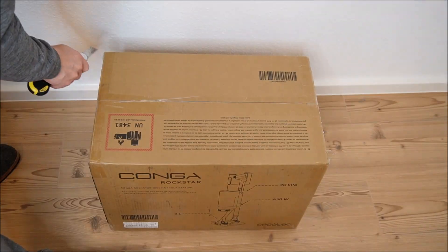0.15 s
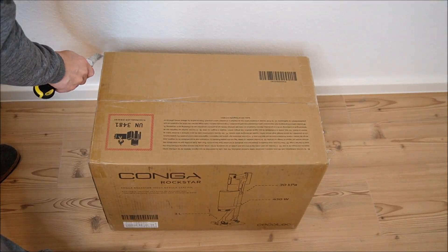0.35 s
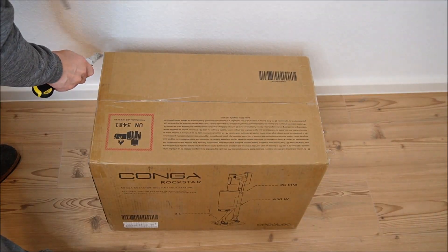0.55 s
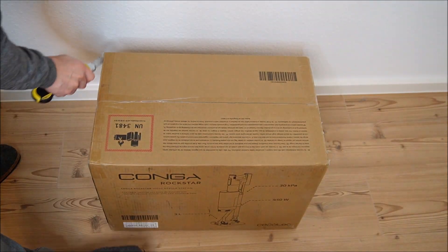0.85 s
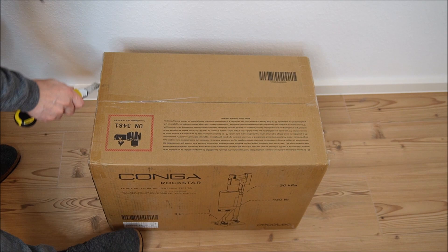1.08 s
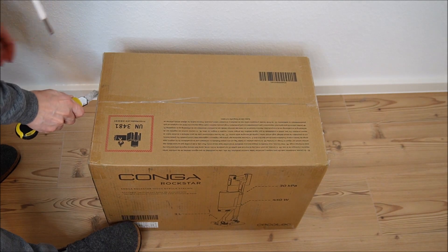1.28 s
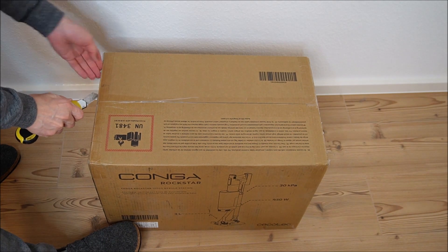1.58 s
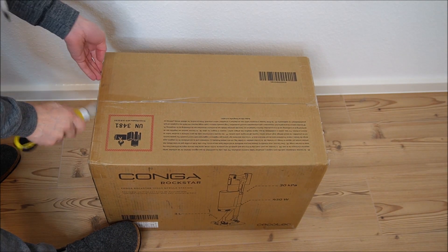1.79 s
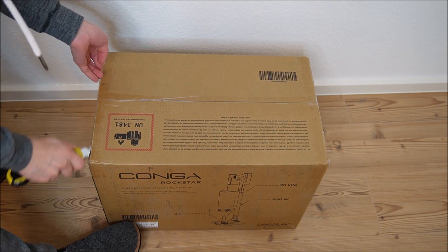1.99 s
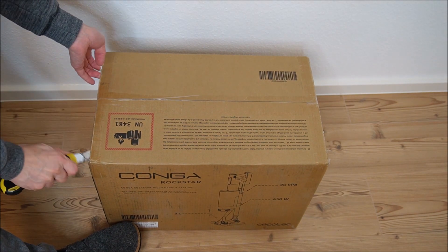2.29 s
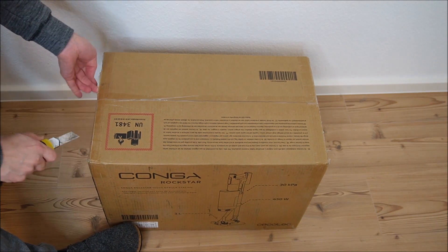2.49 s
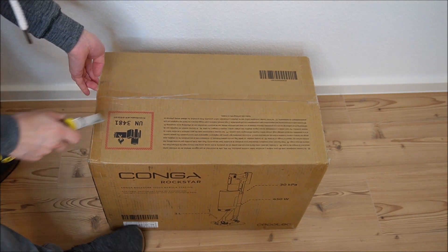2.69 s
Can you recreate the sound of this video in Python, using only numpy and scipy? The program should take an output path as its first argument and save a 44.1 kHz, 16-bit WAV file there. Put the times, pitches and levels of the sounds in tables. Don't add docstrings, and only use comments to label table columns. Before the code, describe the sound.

Box cutter slicing taped cardboard in rough bursts, with crackling tape and sharp blade knocks.

```python
import sys
import numpy as np
from scipy import signal
from scipy.fft import rfft, irfft, next_fast_len
from scipy.io import wavfile
from scipy.ndimage import uniform_filter1d, map_coordinates

SR = 44100
rng = np.random.default_rng(int(sys.argv[2]) if len(sys.argv) > 2 else 0)


def gain_from_db(level_db):
    decades = np.asarray(level_db, float) / 20
    return 10 ** decades


def transcribe(u):
    v = np.clip(np.atleast_2d(u).T, -1, 1)
    q = np.round(v * 32767).astype(np.int16)
    wavfile.write(sys.argv[1], SR, q)


N = 125685
T = np.arange(N) / SR

# [t/s, drag level/dB, box share/dB]
STROKES = [
    [(.638, -48, 9.5), (.665, -44, -7), (.728, -41, -5.5), (.74, -56, 0), (.8, -61, 9)],
    [(.842, -45, 3), (.855, -46.5, 1), (.87, -33, -4), (.9, -34.5, -2), (.95, -31, -9), (1.015, -39.5, 0.5),
     (1.035, -52, -2), (1.05, -44, 1)],
    [(1.05, -43, 8), (1.065, -44, 12.5), (1.1, -38.5, 4), (1.135, -42, 9), (1.16, -34, 0),
     (1.2, -37.5, -2.5), (1.24, -45.5, 3), (1.38, -60.5, 0), (1.6, -64.5, 3.5)],
    [(1.625, -56, 4), (1.64, -47.5, 4), (1.66, -37.5, -0.5), (1.74, -39, -5.5), (1.84, -50.5, 1)],
    [(1.84, -46, 12), (1.86, -51, 5), (1.93, -39, 1.5), (2.06, -39, -7.5), (2.13, -47.5, 3.5),
     (2.2, -57.5, -6), (2.3, -68, 1)],
    [(2.322, -52, -7), (2.37, -44.5, -11), (2.43, -41, -7), (2.445, -56.5, -1), (2.5, -44, -3.5),
     (2.575, -51.5, -10), (2.66, -65, -2)],
    [(2.68, -51.5, -5), (2.73, -51, 7), (2.765, -48.5, -3), (2.8, -40.5, 2), (2.85, -37, 12)],
]
# [t/s, level/dB, hold/s, box share/dB]
CATCHES = [(0.659, -36, 0.004, -11), (0.693, -40, 0.015, -12), (0.715, -45, .012, -7),
           (0.867, -31.5, 0.007, -7), (0.881, -33.5, .006, -4), (0.914, -34, 0.005, -9),
           (0.919, -27, 0.013, -10.5), (0.938, -34.5, .005, -1), (0.963, -28, 0.0087, -9),
           (0.985, -35, .003, -6), (1.01, -38.5, .006, 0), (1.053, -36, 0.006, -4),
           (1.067, -31, 0.01, -9.5), (1.077, -23, 0.0042, -8), (1.087, -22, 0.0081, -11),
           (1.1, -33.5, .008, -3), (1.116, -23, 0.0064, -2), (1.126, -26.5, 0.0054, -2),
           (1.139, -27.5, .004, -1), (1.144, -21.5, 0.0078, -9.5), (1.156, -29.5, 0.0035, -5),
           (1.164, -29.5, 0.0034, -6), (1.172, -29, 0.004, -2.5), (1.181, -26, 0.0096, -6),
           (1.194, -26, 0.0052, -3.5), (1.209, -32, 0.0031, -4), (1.218, -36, 0.0051, -3),
           (1.23, -36.5, 0.0036, -3.5), (1.639, -42.5, 0.013, 2), (1.66, -34, .003, -3),
           (1.663, -34, 0.019, -3), (1.709, -33, 0.0098, -2), (1.741, -33.5, 0.0023, -12),
           (1.845, -35.5, .004, 1), (1.848, -29.5, 0.01, -1), (1.8585, -17.5, 0.0087, -12),
           (1.875, -25.5, 0.013, -4.5), (1.892, -31.5, 0.0099, 2), (2.091, -32.5, 0.0071, -15),
           (2.368, -44, 0.0079, 5), (2.775, -38, 0.0045, 0), (2.804, -32, 0.0054, -6),
           (2.822, -19, 0.0073, -2.5), (2.838, -32.5, .008, 0)]
# [t/s, crack level/dB, bright snap re crack/dB, thud level/dB, thud f/Hz]
TAPS = [(0.6357, -31.5, -26, -37, 195), (0.797, -52, -15, -36, 260), (0.8458, -29.5, -14, -52, 250),
        (1.861, -26, -5, -17.5, 447), (1.868, -40, -10, -28.5, 398), (1.894, -45, -10, -26.5, 200),
        (2.1024, -22.5, -10, -28.5, 314), (2.5738, -38.5, -6, -59, 298), (2.713, -19.5, -5.5, -24.5, 311),
        (2.7191, -34, -17, -42, 195), (2.7704, -25, -30, -32.5, 315), (2.8189, -13.5, -2, -14, 318),
        (2.8263, -21.5, -12, -23, 298), (2.839, -44, -10, -26, 280)]
# [t/s, level/dB, f/Hz, decay/s]
PINGS = [(.668, -48, 3700, .015), (.704, -48, 10000, .004), (.869, -34, 6500, 0.014),
         (.878, -36, 3660, .025), (1.08, -17, 1470, 0.0045), (1.092, -27, 2400, .003),
         (1.118, -20, 1425, 0.0038), (1.1453, -23, 1900, 0.0066), (1.8595, -21, 1630, 0.0061),
         (1.861, -24, 2230, 0.0069), (2.101, -22, 2050, 0.0042), (2.425, -37.5, 2136, .008),
         (2.55, -48, 3960, .02), (2.574, -35.5, 3940, .0045), (2.593, -42, 1400, .004),
         (2.629, -42, 2190, 0.0042), (2.682, -47, 3800, .005), (2.687, -45, 1396, 0.0037),
         (2.769, -32, 1400, .003)]
# [t/s, slip rate f/Hz, level/dB]
SQUEAK = [(2.338, 3600, -46), (2.342, 3900, -34), (2.345, 4450, -32), (2.3484, 4510, -35.5),
          (2.3509, 6160, -32), (2.356, 6370, -41), (2.363, 6500, -52)]
OVERTONES_DB = [-3, -4, -6]
# [t/s, peak level/dB, centre f/Hz]
TICKS = [(.3423, -55, 5000), (.4001, -56, 9000), (0.4204, -56, 7000), (.660, -48, 11000),
         (.949, -40, 14000), (.956, -38, 14000), (1.009, -41, 14000), (1.0715, -36, 10000),
         (1.089, -30, 13000), (1.129, -31, 14000), (1.148, -31, 9000), (1.167, -37, 11500),
         (1.185, -25, 13500), (1.194, -27, 10000), (1.210, -31, 9500), (1.275, -47, 10000),
         (1.308, -47, 12000), (1.4986, -51, 12000), (1.5427, -53, 6100), (2.302, -50, 8000),
         (2.42, -45, 14000), (2.686, -50, 9000), (1.2891, -41, 12000), (1.3552, -40.5, 5100),
         (1.3755, -35.5, 13800), (1.4338, -50, 6260), (1.5525, -50.5, 5980), (1.6105, -45.5, 4000),
         (2.193, -35.5, 6000), (2.29, -40, 11200), (2.321, -36.5, 6000), (2.327, -42, 13200)]
# [t/s, level/dB, f/Hz]
THUMPS = [(0.023, -50, 56.5), (0.044, -46, 86.1), (0.08, -44.5, 106), (0.162, -48, 248), (0.188, -49, 161),
          (0.227, -48.5, 83.4), (0.294, -50, 53.8), (.38, -58, 55), (.81, -51, 70), (1.17, -41, 105),
          (1.209, -45, 95.5), (1.26, -47, 100), (1.36, -55, 70), (1.864, -37, 100), (1.90, -41, 90),
          (1.94, -44, 110), (2.715, -40, 95), (2.74, -51, 80), (2.82, -36.5, 120)]
# [f/Hz, width/Hz, level/dB]
BOX_MODES = [(97, 32.5, -5.5), (195, 42, -0.5), (254, 42.3, 0.5), (318, 47, -2.5), (400.6, 39.7, -3),
             (468, 46.7, -3), (628, 172, -13.5)]
FLAP_MODES = [(1258, 32, 0), (1396, 41, -2.5), (1620, 290, -12), (1960, 91, -1.5), (2265, 41, -3.5),
              (2400, 31, 1.5)]
BOARD_MODES = [(1800, 800, 0), (2600, 700, -3), (4000, 1800, -9)]
BLADE_MODES = [(4360, 750, -2.5), (6250, 400, 4), (9000, 480, -2.5), (10800, 700, -1), (13200, 800, -1)]
# [f/Hz, level/dB]
TAPE_COLOUR = [(100, -70), (350, -38), (600, -14), (834, -16.5), (1410, -0.5), (2010, -2.5), (2570, -5.5),
               (7520, -13.5), (13200, -14), (16000, -18)]
SNAP_COLOUR = [(3000, 6), (5500, 0), (14000, -21), (16000, -2)]
RUSTLE_COLOUR = [(1470, -40), (2800, -16), (4020, 7), (6000, 4), (8000, -2), (12000, 0), (15500, -7),
                 (16000, -13)]
AIR_COLOUR = [(12, -20), (20, -8), (48, -6), (234, -12.5), (388, -7.5), (1290, -19), (1860, -16.5),
              (14300, -32), (16000, -34)]
MIC_EDGE = [(15700, 0), (16000, -24), (16700, -33)]
# [f/Hz, t60/s]
ROOM_T60 = [(150, 0.45), (1500, 0.3), (6000, 0.42), (15000, 0.078)]


def unit(x):
    return x / np.sqrt(np.mean(x ** 2) + 1e-20)


def along(points, f_hz):
    f, value = np.transpose(points)
    return np.interp(np.log(f_hz + 1), np.log(f + 1), value)


def filtered(x, response):
    m = next_fast_len(N + SR // 2)
    h = response(np.fft.rfftfreq(m, 1 / SR))
    h = h / np.sqrt(np.mean(abs(h) ** 2))
    return irfft(rfft(x, m) * h, m)[:N]


def rings(modes, widen):
    def response(f):
        total = 0
        for k, (centre_hz, width_hz, db) in enumerate(modes):
            loss = 1j * f * width_hz * widen
            total = total + (-1) ** k * gain_from_db(db) * loss / (centre_hz * centre_hz - f * f + loss)
        return total
    return response


def colour(points):
    return lambda f: gain_from_db(along(points, f))


def wobble(rate_hz):
    return map_coordinates(rng.standard_normal(N // 8), [T * rate_hz])


def burst(start_s, rise_s, fall_s, hold_s=0):
    t = np.maximum(T - start_s, 0)
    return (1 - np.exp(-t / rise_s)) * np.exp(-np.maximum(t - hold_s, 0) / fall_s)


def grit(spread_db, lump_db):
    spike_db = spread_db * np.minimum(rng.exponential(size=N), 4)
    clump_db = lump_db * (1.2 * wobble(600) + wobble(120))
    return unit(rng.standard_normal(N) * gain_from_db(spike_db + clump_db))


def cutting():
    drag, wall = np.zeros(N), np.zeros(N)
    for rows in STROKES:
        s, db, share_db = np.transpose(rows)
        on = (T >= s[0]) & (T < s[-1])
        drag += on * gain_from_db(np.interp(T, s, db))
        wall += on * gain_from_db(np.interp(T, s, db + share_db))
    for s, db, hold_s, share_db in CATCHES:
        snag = gain_from_db(db) * burst(s, 0.00095, 0.0041, hold_s)
        drag = np.hypot(drag, snag)
        wall = np.hypot(wall, gain_from_db(share_db) * snag)

    force = drag * grit(spread_db=2.0, lump_db=1.46)
    fibres_per_s = 300
    fibres = drag * unit(rng.standard_normal(N) * (rng.random(N) < fibres_per_s / SR))
    flap_response = lambda f: rings(FLAP_MODES, widen=1.0)(f) * (f / (f - 700j)) ** 2
    wall_response = lambda f: rings(BOX_MODES, widen=1.1)(f) * (f / (f - 80j)) ** 4

    snaps = gain_from_db(-13) * filtered(fibres, colour(SNAP_COLOUR))
    flap = gain_from_db(-14) * filtered(force * rng.choice([-1, 1], N), flap_response)
    tape = gain_from_db(-1.5) * filtered(force, colour(TAPE_COLOUR))
    walls = filtered(grit(spread_db=1.5, lump_db=2.0) * wall, wall_response)
    return snaps + flap + tape + walls


def patchy(x, depth_db):
    z = signal.stft(x, nperseg=512)[2]
    field = uniform_filter1d(rng.standard_normal(z.shape), size=4, axis=0)
    field = uniform_filter1d(field, size=6, axis=1)
    gain_db = depth_db * unit(field) - depth_db ** 2 / 9
    return signal.istft(z * gain_from_db(gain_db), nperseg=512)[1][:N]


def taps():
    fall_s, thud_lag_s = 0.002, 0.0013
    spikes = np.sign(rng.standard_normal(N)) * gain_from_db(3.0 * rng.standard_normal(N))
    crack, snap, thud = np.zeros(N), np.zeros(N), np.zeros(N)
    for s, crack_db, bright_db, thud_db, thud_hz in TAPS:
        crack += gain_from_db(crack_db) * burst(s, 0.00015, fall_s, 0.00091)
        snap += gain_from_db(crack_db + bright_db) * burst(s, 0.00022, fall_s, 0.00034)
        tone = np.sin(2 * np.pi * thud_hz * (T - s) + wobble(120) / 2)
        thud += gain_from_db(thud_db + 5.5) * burst(s + thud_lag_s, 0.002, 0.0083) * tone
    board = filtered(crack * spikes, rings(BOARD_MODES, widen=0.79))
    return board + filtered(snap * spikes, colour(SNAP_COLOUR)) + thud


def pings():
    out = np.zeros(N)
    for s, db, hz, decay_s in PINGS:
        note = np.sin(2 * np.pi * hz * T + 0.57 * wobble(300))
        out += gain_from_db(db) * burst(s, 0.00035, decay_s) * note
    return out


def squeak():
    s, hz, db = np.transpose(SQUEAK)
    rate_hz = np.interp(T, s, hz)
    phase = 2 * np.pi * np.cumsum(rate_hz) / SR + 1.1 * wobble(1100)
    tone = np.zeros(N)
    for k, level_db in enumerate(OVERTONES_DB, 1):
        tone += gain_from_db(level_db + 2.1 * wobble(630)) * np.sin(k * phase) * (k * rate_hz < 16000)
    hiss = gain_from_db(3) * filtered(rng.standard_normal(N), lambda f: (f > 7000) * 1.)
    level = gain_from_db(np.interp(T, s, db - 7.5, left=-120, right=-120))
    return filtered(level * (tone + hiss), rings(BLADE_MODES, widen=.8))


def crackle():
    out, t = np.zeros(N + 999), np.arange(600) / SR
    for s, db, hz in TICKS:
        b, a = signal.iirpeak(min(hz, 19000), 1.2, SR)
        click = unit(signal.lfilter(b, a, rng.standard_normal(len(t)))) * np.exp(-t / 0.002)
        out[round(s * SR):][:len(t)] += gain_from_db(db - 1.5) * click
    return out[:N]


def handling():
    centre_s, half_width_s = .048, .026
    rustle = filtered(grit(spread_db=0.0, lump_db=0.5), colour(RUSTLE_COLOUR))
    out = gain_from_db(-51) * rustle * np.exp(-((T - centre_s) / half_width_s) ** 4)
    for s, db, hz in THUMPS:
        swell = np.exp(-(1.5 * hz * (T - s - .5 / hz)) ** 2)
        out += gain_from_db(db + 2.5) * np.sin(2 * np.pi * hz * (T - s)) * swell
    return out


def room(x):
    hz, t, z = signal.stft(rng.standard_normal(SR // 2), SR, nperseg=256)
    decay = gain_from_db(-60 * t / along(ROOM_T60, hz)[:, None])
    tail = signal.istft(z * decay, SR, nperseg=256)[1]
    return signal.fftconvolve(np.pad(x, (120, 0)), tail / np.linalg.norm(tail))[:N]


def air():
    settle_s = 0.24
    level_db = -60.5 + 8.5 * np.exp(-T / settle_s) + 0.2 * wobble(6.5)
    return gain_from_db(level_db) * filtered(rng.standard_normal(N), colour(AIR_COLOUR))


def scene():
    near = patchy(cutting(), depth_db=1.75) + taps() + crackle() + squeak()
    return (near + pings() + gain_from_db(-10.5) * room(near) + handling() + air())[None]


def low_pass(x):
    return signal.sosfilt(signal.butter(12, 16890, fs=SR, output="sos"), x)


def record(dry):
    m = next_fast_len(N + 4096)
    gain = gain_from_db(along(MIC_EDGE, np.fft.rfftfreq(m, 1 / SR)))
    mix = irfft(rfft(dry, m) * gain, m)[:, :N]
    return low_pass(mix)


dry = scene()
out = record(dry)
transcribe(out)
```